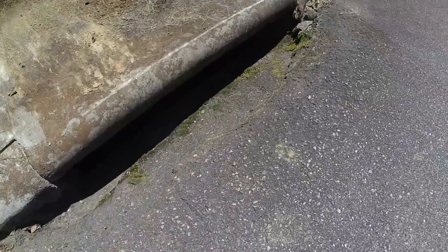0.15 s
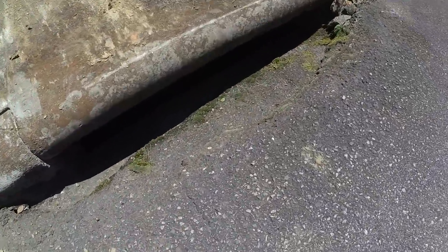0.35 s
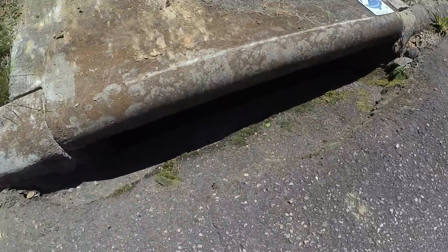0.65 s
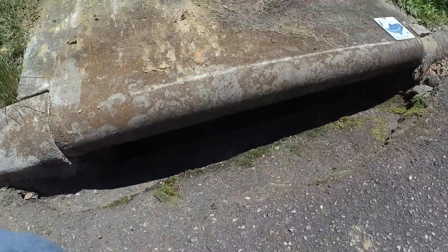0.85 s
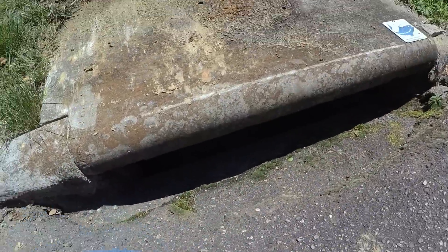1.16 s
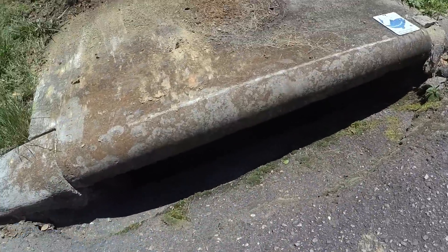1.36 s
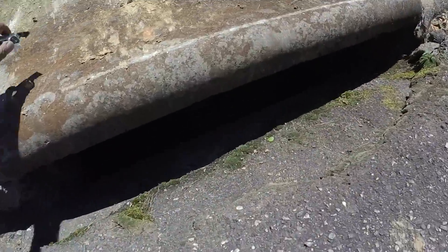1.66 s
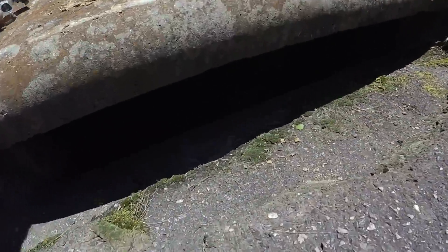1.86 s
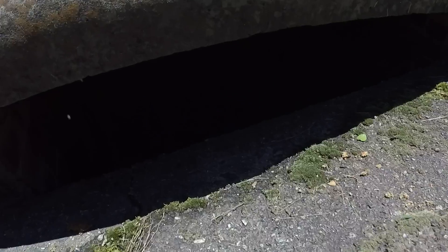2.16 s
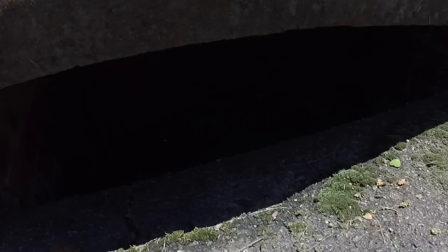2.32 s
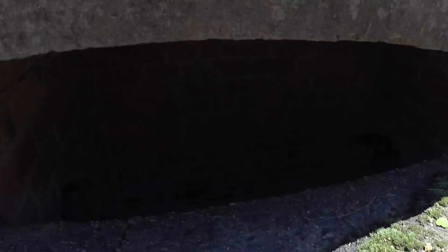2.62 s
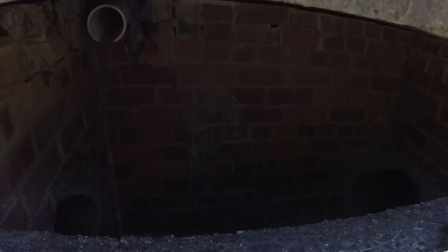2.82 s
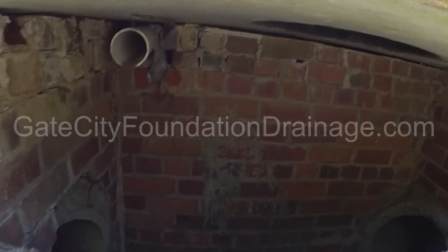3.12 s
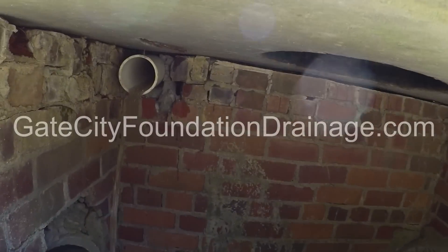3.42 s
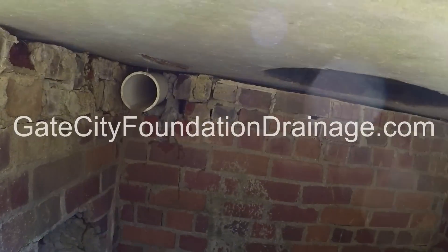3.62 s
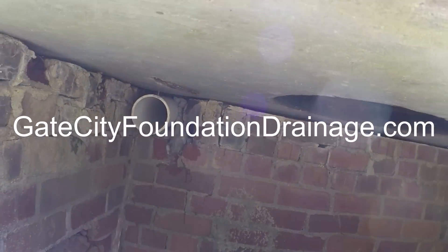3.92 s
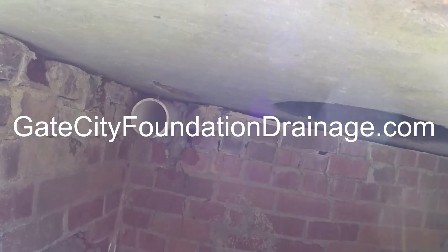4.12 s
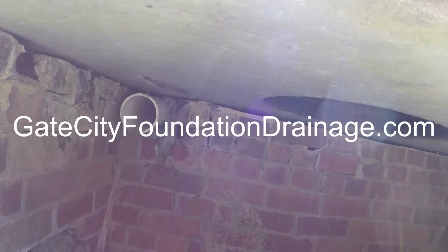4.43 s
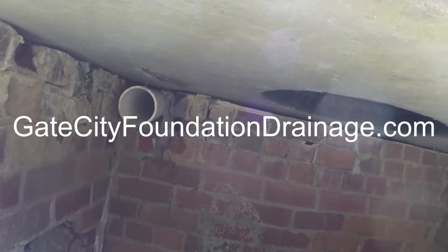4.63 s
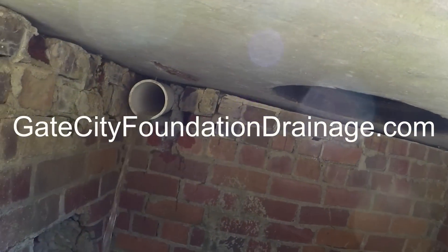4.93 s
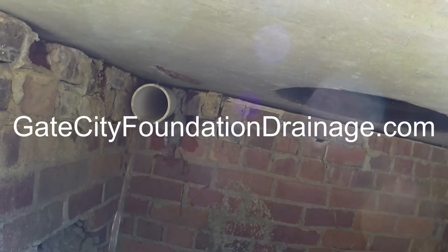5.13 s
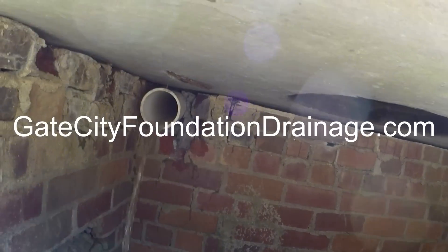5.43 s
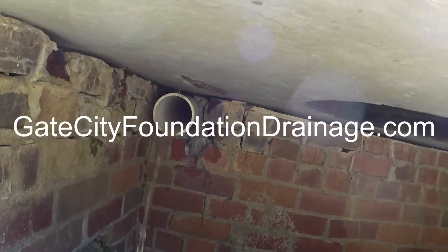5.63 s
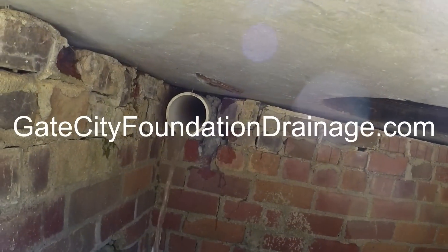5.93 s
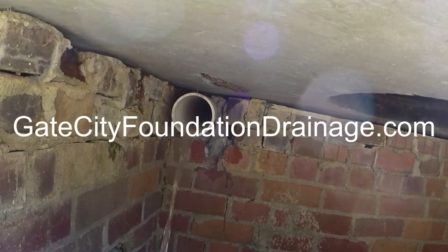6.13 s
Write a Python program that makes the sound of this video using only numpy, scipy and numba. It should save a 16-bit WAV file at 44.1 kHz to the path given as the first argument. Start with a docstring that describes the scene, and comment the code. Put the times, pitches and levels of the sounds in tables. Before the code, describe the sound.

Muffled trickling and soft handling thumps, a sharp double clack, then close crackling water pouring and gulping into a small brick-walled pool.

```python
"""A thin stream of water falls from a drain pipe into a brick basin under a concrete slab by the road.
At first it sounds screened off: drops and tiny bubbles crackle while the hand shifts on a camera.
About two seconds in, the camera bumps the concrete at the slot and is then pushed inside.
There the water is louder and brighter, with bigger splashes, gulps and a churning pool.
Grains of damped sine make the water, filtered noise the rumble, decaying echoes the brick walls."""
import sys
import numpy as np
from scipy import signal
from scipy.fft import rfft, irfft
from scipy.io import wavfile
from scipy.ndimage import uniform_filter1d, minimum_filter1d
from numba import njit

SR = 44100
rng = np.random.default_rng(int(sys.argv[2]) if len(sys.argv) > 2 else 0)


def store_pcm(level_fs):
    """Save levels as 16-bit WAV."""
    pcm = np.round(np.clip(level_fs, -1, 1) * 32767).astype(np.int16)
    wavfile.write(sys.argv[1], SR, np.atleast_2d(pcm).T)


N = 276507
T = np.arange(N) / SR

# distant outdoor rumble, spectrum: pitch_hz, relative_db
OUTDOOR_COLOUR = [(20, 1.5), (45, -6), (80, 0.5), (160, 1), (300, -6), (600, -19.5), (1500, -34),
                  (4000, -32)]
# loudness of that rumble: time_s, rms_db
OUTDOOR_LEVEL = [(0, -54), (1.2, -48.5), (2.6, -54.5), (3.5, -55.5), (6.27, -62)]
# standing waves between the brick walls: pitch_hz, width_hz, relative_db
BASIN_MODES = [(144.8, 3.7, 5.5), (182.4, 11, 2.5), (227, 18, 2), (292, 56, -3), (359.6, 7.6, 4.5),
               (519, 25, -7), (620, 9.7, -14)]
# loudness of the standing waves together: time_s, gain_db
BOOM_LEVEL = [(0, -56.5), (2.2, -58), (3.2, -58.5), (4.5, -52), (5.7, -48), (6.27, -51.5)]
# the hand shifts on the camera: centre_s, peak_db, pitch_hz, rub_duration_s
THUMPS = [(0.199, -30.5, 930, 0.013), (0.223, -29.5, 310, 0.0081), (1.3, -26, 2100, 0.037),
          (1.338, -25.5, 400, 0.018), (1.4, -30, 400, 0.029), (1.465, -35, 634, 0.0031),
          (1.572, -24, 330, 0.0044), (1.665, -32, 540, 0.021), (1.868, -27, 143, 0.02),
          (1.946, -23, 137, 0.0076), (5.954, -33, 86, 0.038)]
# spells of soft, dull nudges while the camera is lowered and pushed in: start_s, length_s, middle_peak_db
FIDGETS = [(1.299, 0.3, -37), (1.848, .16, -40.5), (2.501, .32, -48)]
# the camera case bumps the concrete: start_s, peak_db (before echo and limiter), hardness_hz, case_ring_db
KNOCKS = [(2.0525, -9, 2100, -6), (2.0728, -1, 8500, 1), (2.217, -27, 3000, -3)]
# ringing modes of the case: pitch_hz, relative_db, t60_s
CASE_MODES = [(530, -24, 0.021), (840, -2.5, 0.011), (1196, 3.5, 0.016), (1654, -0.5, 0.08),
              (2060, 8, 0.014), (2490, 10, 0.019), (3220, 3.5, 0.018), (3780, -5, 0.11), (4600, 7, 0.034),
              (5250, -13, 0.016), (5740, 9, 0.007), (6490, 13, 0.011)]
# sharp ticks and a bright drop close to the microphone: start_s, peak_db (before the low-pass), centre_hz
TICKS = [(0.214, -18, 4500), (0.2184, -14.5, 3800), (0.2244, -20, 1150), (0.2273, -20.5, 3000),
         (2.682, -8.5, 5160), (2.6867, -9.5, 4150), (5.3612, -14, 6100)]
# single drips close by: start_s, peak_db (before echo), starting_pitch_hz
DRIPS = [(2.187, -20.5, 1336), (5.464, -28.5, 1424), (5.72, -28.5, 1570)]
# way of the microphone into the basin: time_s, share_inside (0-1)
INSIDE = [(0, 0.18), (1.8, 0.35), (2.4, 0.38), (3.4, 0.92), (6.2, 1.0)]
# tone of the churning pool: pitch_hz, relative_db
CHURN_COLOUR = [(150, -14), (370, -5), (470, -8.5), (600, 1.5), (720, -4.5), (950, -6), (1100, 2.5),
                (1600, -1.5), (2400, 0), (3500, -3), (6000, -38)]
# large air pockets closing in the pool: start_s, level_db (before gain and echo), lowest_pitch_hz
GULPS = [(2.405, -32.5, 615), (2.74, -30, 1300), (3.16, -27.5, 1070), (3.508, -29.5, 860),
         (3.745, -31, 940), (3.81, -29, 990), (4.5, -29.5, 1000), (4.65, -24.5, 960), (5.029, -34, 810),
         (5.465, -26.5, 1120), (6.026, -26, 905)]
# the biggest slugs of water hitting the pool: start_s, level_db (before echo and tone), centre_hz, duration_s
SPLASHES = [(0.453, -30.5, 3320, .016), (0.568, -32, 4500, 0.019), (0.678, -33, 4680, 0.014),
            (1.119, -30.5, 3140, 0.0068), (1.164, -30.5, 3000, 0.013), (1.253, -28.5, 2840, .007),
            (1.921, -30, 6200, 0.0049), (2.03, -26.5, 6100, 0.011), (2.496, -32, 4950, .008),
            (2.6, -22, 4900, .007), (2.677, -22.5, 4300, 0.009), (2.768, -21, 5700, 0.0052),
            (2.785, -18, 3800, 0.0088), (2.971, -21, 4740, .008), (3.123, -22, 3530, .028),
            (3.417, -24.5, 4170, 0.0071), (3.696, -22, 4800, 0.0091), (3.812, -23.5, 3620, .006),
            (3.872, -20.5, 4300, 0.0073), (4.378, -19.5, 4900, 0.0064), (4.503, -21, 2830, 0.01),
            (4.675, -27, 4330, .01), (4.857, -21, 4550, 0.0043), (5.082, -24.5, 5500, .012),
            (5.295, -24, 4740, 0.004), (5.327, -24, 6550, .013), (5.36, -20, 6000, .008),
            (5.674, -19.5, 6200, 0.003), (5.685, -21.5, 4000, 0.0085), (5.789, -22.5, 5130, 0.0056),
            (6.038, -13, 6450, 0.0052), (6.054, -15.5, 3760, 0.0087)]
# strength of the falling water before echo and tone, rising near the slot: time_s, level_db
WATER_LEVEL = [(0.0, -38), (0.54, -38.5), (0.86, -40), (1.53, -39.5), (2.06, -32.5), (2.18, -30.5),
               (3.11, -29), (3.35, -29.5), (5.46, -28), (5.76, -31.5), (6.27, -30)]
# tone of the water from the road: pitch_hz, relative_db
ROAD_COLOUR = [(300, -16), (900, -12), (1800, -8), (2700, 2), (4200, 3), (6300, 6.5), (7800, -2),
               (10000, -13), (15000, -31)]
# tone of the water inside the basin: pitch_hz, relative_db
BASIN_COLOUR = [(300, -26), (900, -19), (1800, -8), (2700, 0.5), (4200, 1), (5200, 5), (6400, 7.5),
                (7500, 1.5), (10000, -6), (15000, -20.5)]

# fine spray and small slugs, relative to WATER_LEVEL (dB)
SPRAY_DB, SLUG_DB = -1.88, -0.1
# churn inside the basin before echo, and how much of it the slab screens off (dB)
CHURN_DB, SLAB_DB = -46, 13
TOP_HZ = 15300  # the treble ends here


def undb(db):
    """Decibels to gain."""
    return 10 ** (np.asarray(db) / 20)


def unit(x):
    """Scale to rms 1."""
    return x / np.sqrt(np.mean(x ** 2) + 1e-20)


def at(rows, s):
    """Value at times s of rows (time_s, value) joined by straight lines."""
    return np.interp(s, *np.transpose(rows))


def curve(rows):
    """The same joined rows over the whole scene."""
    return at(rows, T)


def wander(hz):
    """Smooth, bounded chance that heads for a new value hz times a second."""
    return np.interp(T * hz, np.arange(8192), rng.uniform(-2, 2, 8192))


def add(out, s, x):
    """Mix x into out from time s."""
    i = max(int(s * SR), 0)
    out[i:i + len(x)] += x[:max(N - i, 0)]


def add_peak(out, s, x, db):
    """Mix x into out from time s, with its peak at db."""
    add(out, s, undb(db) * x / np.abs(x).max())


def band(x, hz, width_hz):
    """Two-pole resonance, gain 1 at the centre."""
    hz = min(hz, .45 * SR)
    b, a = signal.iirpeak(hz, hz / min(width_hz, SR / 4), fs=SR)
    return signal.lfilter(b, a, x)


def colour(x, points, size=4096):
    """Causal minimum-phase filter through (pitch_hz, relative_db) that keeps the power of white noise."""
    hz, db = np.transpose(points)
    bins_hz = np.arange(size // 2 + 1) * SR / size
    gain = undb(np.interp(np.log(bins_hz + 1), np.log(hz), db))
    # folding the cepstrum forward in time makes the filter causal
    cepstrum = irfft(np.log(unit(gain)))
    cepstrum[1:size // 2] *= 2
    cepstrum[size // 2 + 1:] = 0
    response = irfft(np.exp(rfft(cepstrum)))
    return signal.fftconvolve(x, response)[:len(x)]


@njit
def grains(times, hz, cycles, size, glide):
    """Damped, rising sines that die within their number of cycles; size sets the energy."""
    out = np.zeros(N)
    for k in range(len(times)):
        start, length = int(times[k] * SR), int(cycles[k] * SR / hz[k]) + 2
        step = 2 * np.pi * hz[k] / SR
        # a decaying phasor: turn rotates and damps it, bend speeds up the turning
        phasor = size[k] * np.sqrt(24 / length) + 0j
        turn = np.exp(1j * step - 6 / length)
        bend = np.exp(1j * step * glide / length)
        for i in range(max(start, 0), min(start + length, N)):
            phasor *= turn
            turn *= bend
            out[i] += phasor.imag
    return out


def sizes(chance, spread_db):
    """Many small drops and a few large ones, from uniform chance."""
    return undb(-spread_db * np.log(chance + .02))


def basin(x, early_t60, late_t60, early_db, late_db, damp_hz=6000, count=9, hop_hz=50):
    """Brick walls answer at once, then a duller tail; sound hops between spots, each with its own echoes."""
    t, out = T[:SR // 2], 0
    spots = np.array([wander(min(hop_hz, 1200)) for _ in range(count)])
    for share in spots / np.linalg.norm(spots, axis=0):
        # the first echo arrives after a millisecond
        early, late = rng.standard_normal((2, len(t))) * (t > .001)
        early = early * undb(-60 * t / early_t60)
        late = late * undb(-60 * t / late_t60)
        late = signal.lfilter(*signal.butter(1, min(damp_hz, SR / 3), fs=SR), late)
        early = undb(early_db) * early / np.linalg.norm(early)
        late = undb(late_db) * late / np.linalg.norm(late)
        out = out + signal.oaconvolve(x * share, early + late)[:N]
    # make up for the energy the echoes add
    return (x + out) / np.sqrt(1 + undb(2 * early_db) + undb(2 * late_db))


def outdoors():
    """Low rumble of air and far traffic, shaped from noise and fainter inside the basin."""
    rumble = colour(rng.standard_normal(N), OUTDOOR_COLOUR)
    return unit(rumble) * undb(curve(OUTDOOR_LEVEL))


def boom():
    """Falling water keeps the low standing waves humming: noise drives a bank of resonances."""
    drive = rng.standard_normal(N)
    hum = sum(undb(db) * band(drive, hz, width) for hz, width, db in BASIN_MODES)
    return unit(hum) * undb(curve(BOOM_LEVEL))


def fidgets(count=7, centre_hz=88, octaves=0.32, scatter_db=3, duration_s=0.022):
    """Small, dull nudges of the fingers at a loose pace, as rows like THUMPS."""
    rows = []
    for start, length, db in FIDGETS:
        for k, (late, size, pitch) in enumerate(rng.uniform(-1, 1, (count, 3))):
            s = start + length * (k + .5 + .5 * late) / count
            hz = centre_hz * 2 ** (octaves * pitch)
            rows.append((s, db + scatter_db * size, hz, duration_s))
    return rows


def thumps(cycles=1.0, rub_db=0):
    """Fingers push and rub on the camera; its body passes on a dull swing of a cycle or two."""
    out, t = np.zeros(N), T[:SR // 4] - T[SR // 8]
    for s, db, hz, duration in np.vstack([THUMPS, fidgets()]):
        push = np.sin(2 * np.pi * hz * t) * np.exp(-(hz * t / cycles) ** 2)
        rub = band(band(rng.standard_normal(len(t)), hz, 1.3 * hz), hz, 1.3 * hz)
        rub = rub * np.exp(-(t / duration) ** 2)
        x = push + undb(rub_db) * rub / np.abs(rub).max()
        add_peak(out, s + t[0], x, db)
    return out


def knocks(grit_db=-20, grit_s=0.0018, crack_db=2, crack_s=0.017):
    """A blow cracks on gritty concrete and rings the case; softer blows miss the high modes."""
    out, t, ring = np.zeros(N), T[:SR // 8], 0
    for k, (hz, db, t60) in enumerate(CASE_MODES):
        # neighbouring modes start in opposite directions
        ring = ring + (-1) ** k * undb(db - 60 * t / t60) * np.sin(2 * np.pi * hz * t)
    for s, db, hard_hz, ring_db in KNOCKS:
        grit, crack = rng.standard_normal((2, len(t)))
        push = signal.unit_impulse(len(t)) + undb(grit_db) * grit * np.exp(-t / grit_s)
        case = undb(ring_db) * signal.fftconvolve(push, ring)[:len(t)]
        crack = undb(crack_db) * band(crack, 2700, 4400) * np.exp(-t / crack_s)
        x = signal.lfilter(*signal.butter(4, min(hard_hz, SR / 3), fs=SR), case + crack)
        add_peak(out, s, x, db)
    return out


def ticks(width=0.58, grit_db=-15, grit_s=0.0023):
    """Short, sharp ticks and a drop: an impulse rings for a cycle or two, with a little grit behind it."""
    out, t = np.zeros(N), T[:SR // 40]
    for s, db, hz in TICKS:
        grit = rng.standard_normal(len(t)) * np.exp(-t / grit_s)
        push = signal.unit_impulse(len(t)) + undb(grit_db) * grit
        x = band(band(push, hz, width * hz), hz, 2 * width * hz)
        add_peak(out, s, x, db)
    return signal.sosfilt(signal.butter(4, 8000, fs=SR, output="sos"), out)


def drips(rise=0.32, rise_s=0.0029, attack_s=0.00018, decay_s=0.005):
    """One bubble pinches off and its pitch jumps up as it nears the surface."""
    out, t = np.zeros(N), T[:SR // 16]
    for s, db, hz in DRIPS:
        pitch = hz * (1 + rise * (1 - np.exp(-t / rise_s)))
        phase = 2 * np.pi * np.cumsum(pitch) / SR
        x = np.sin(phase) * (1 - np.exp(-t / attack_s)) * np.exp(-t / decay_s)
        add_peak(out, s, x, db)
    return out


def churn(count=5000, low_hz=330, high_hz=2700, cycles=9, glide=0.46):
    """The jet drags air under; bubbles ring and rise in pitch. Outside, the slab screens them off."""
    when, pitch, ring, size = rng.random((count, 4)).T
    hz = low_hz + pitch * (high_hz - low_hz)
    x = grains(when * N / SR, hz, cycles * (.5 + ring), sizes(size, 3.5), glide)
    return unit(colour(x, CHURN_COLOUR)) * undb(CHURN_DB - SLAB_DB * (1 - curve(INSIDE)))


def gulps(count=20, octaves=1.0, duration=0.037, cycles=11, gain_db=6):
    """An air pocket breaks into a cloud of bubbles, all smaller and higher than itself."""
    s, db, hz = np.repeat(GULPS, count, axis=0).T
    delay, pitch, size = rng.random((len(s), 3)).T
    bubble_hz = hz * 2 ** (octaves * pitch)
    strength = undb(db + gain_db) * (.5 + size)
    return grains(s + duration * delay, bubble_hz, np.full(len(s), 1. * cycles), strength, 0.23)


def slugs(count=80, scatter_db=5.0, centre_hz=4900, octaves=0.65, duration_s=.009):
    """The stream keeps breaking into small slugs at a loose pace, as rows like SPLASHES."""
    late, size, pitch, length = rng.uniform(-1, 1, (count, 4)).T
    s = (np.arange(count) + .5 + .5 * late) / count * N / SR
    db = at(WATER_LEVEL, s) + SLUG_DB + scatter_db * size
    return np.transpose([s, db, centre_hz * 2 ** (octaves * pitch), duration_s * 2 ** (.5 * length)])


def splashes(count=220, octaves=0.5, cycles=5.1, spread_db=2.0, glide=0.057,
             slap_db=2.0, sink_octaves=0.2, smear=.12):
    """Each slug slaps the pool and bursts into droplets that thin out quickly, tending lower at the end."""
    rows = []
    for s, db, hz, duration in np.vstack([slugs(), SPLASHES]):
        order, ring, size = rng.random((3, count))
        delay = -duration * np.log(1 - .97 * order)
        # the first few milliseconds hit hardest
        size = sizes(size, spread_db) * undb(slap_db * np.exp(-delay / .004))
        delay = delay + smear * duration * rng.standard_normal(count)
        shift = octaves * rng.standard_normal(count) + sink_octaves * (.5 - order)
        pitch = np.clip(hz * 2 ** shift, 300, 18000)
        strength = undb(db) * np.sqrt(duration * SR / 2)
        size = strength * size / np.linalg.norm(size)
        rows.append([s + delay, pitch, 2 - cycles * np.log(ring), size])
    return grains(*np.hstack(rows), glide)


def spray(count=22000, spread_db=3.5, cycles=4.5, glide=0.36,
          surge_db=1.47, surge_hz=90, tilt_db=1.63, tilt_hz=22):
    """Drops crack on the pool and leave tiny bubbles; the stream comes in uneven beads, now coarse, now fine."""
    when, pitch, ring, size = rng.random((count, 4)).T
    hz = 500 + pitch * 15000
    # the balance tips between drops below and above 4500 Hz
    fineness = wander(tilt_hz)[(when * N).astype(int)] * np.clip(np.log2(hz / 4500), -1, 1)
    strength = sizes(size, spread_db) * undb(tilt_db * fineness)
    x = grains(when * N / SR, hz, 2 - cycles * np.log(ring), strength, glide)
    surging = x * undb(surge_db * wander(surge_hz))
    return unit(surging) * undb(curve(WATER_LEVEL) + SPRAY_DB)


def scene(close_wet_db=-13):
    """The water is heard first through the slot, then from inside, with ticks, bumps and drips up close."""
    water = basin(spray() + splashes(), early_t60=0.024, late_t60=0.34,
                  early_db=-1.0, late_db=-4.5, hop_hz=260.15)
    inside = np.clip(curve(INSIDE), 0, 1)
    water = (1 - inside) * colour(water, ROAD_COLOUR) + inside * colour(water, BASIN_COLOUR)
    # long waves hardly tell the spots apart, so the pool uses few spots and slow hops
    pool = basin(churn() + gulps(), early_t60=0.031, late_t60=0.16, early_db=3.5, late_db=-4.0, count=2)
    close = ticks() + knocks() + drips()
    echoes = basin(close, early_t60=0.11, late_t60=0.18, early_db=-35, late_db=0, count=2)
    close = close + undb(close_wet_db) * echoes
    return (water + pool + boom() + close + thumps() + outdoors())[None]


def record(dry, low_cut_hz=36):
    """The camera drops the deepest rumble, limits the loudest peaks and cuts the top of the treble."""
    dry = signal.sosfilt(signal.butter(2, low_cut_hz, "high", fs=SR, output="sos"), dry)
    allowed = np.minimum(1, .8 / (np.abs(dry) + 1e-9))
    # hold each dip in gain for about 3 ms, then smooth it
    gain = uniform_filter1d(minimum_filter1d(allowed, size=129), size=129)
    return signal.sosfilt(signal.ellip(10, .2, 70, TOP_HZ, fs=SR, output="sos"), dry * gain)


dry = scene()
out = record(dry)
store_pcm(out)
```